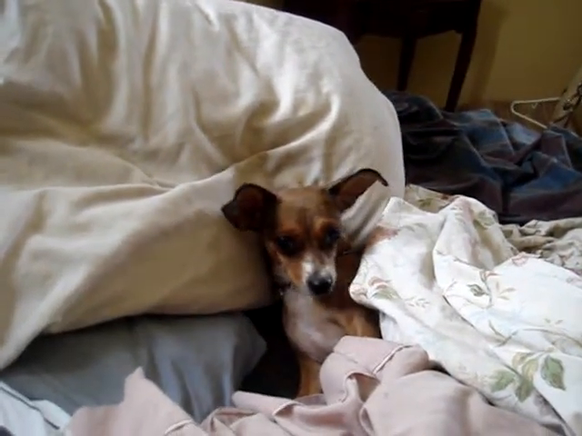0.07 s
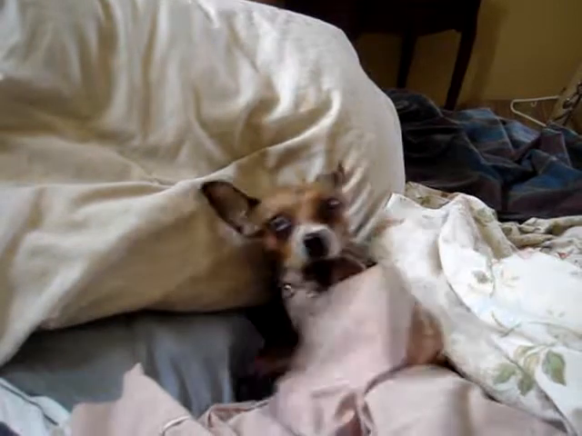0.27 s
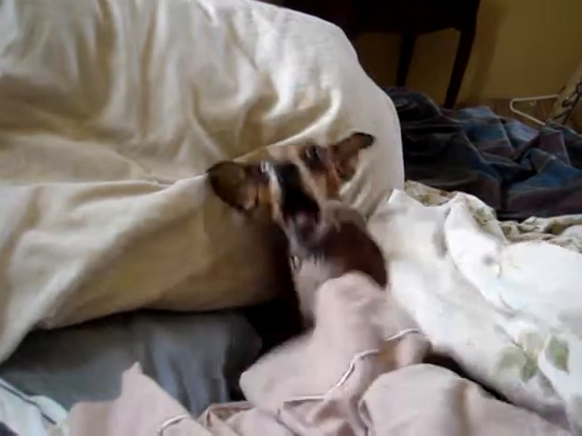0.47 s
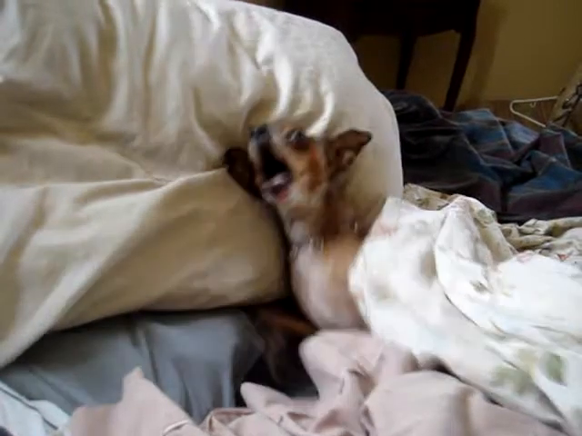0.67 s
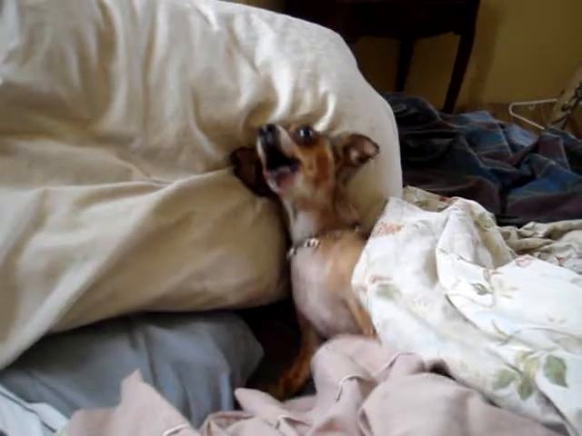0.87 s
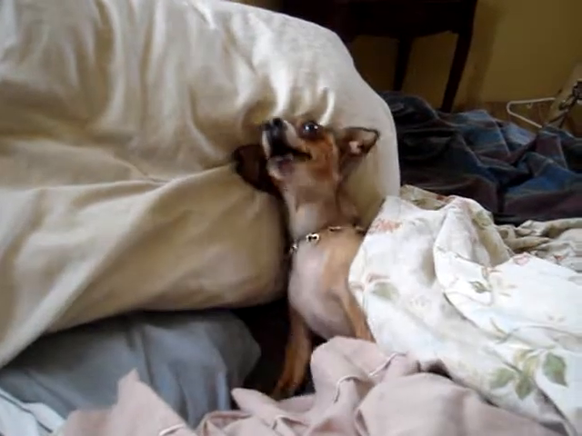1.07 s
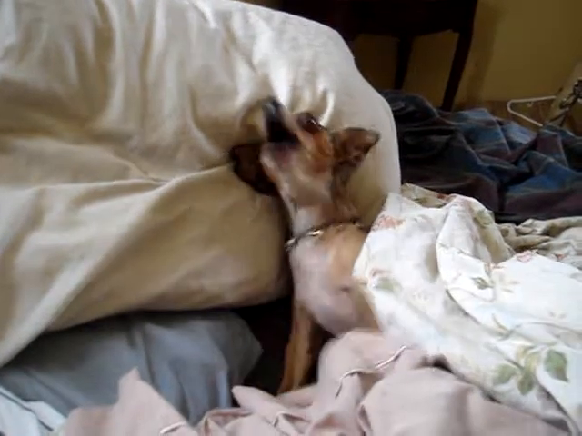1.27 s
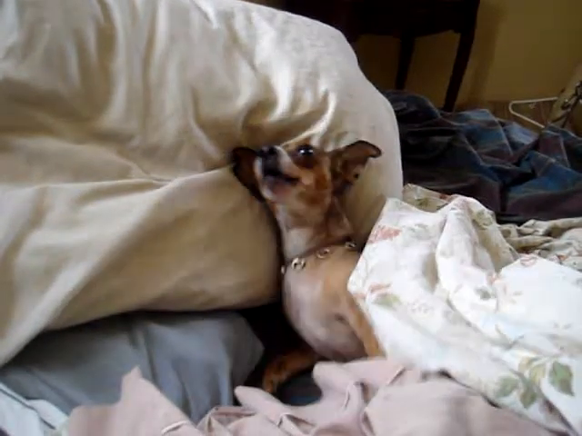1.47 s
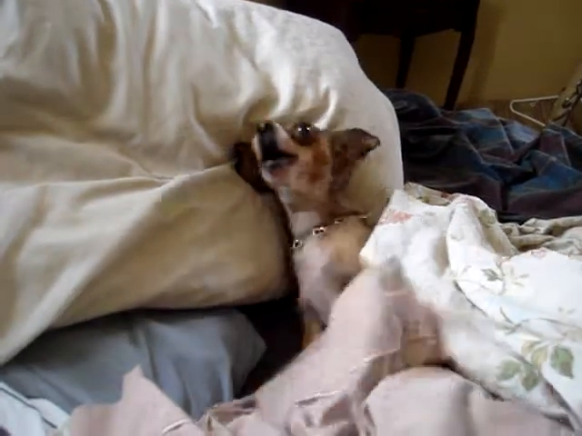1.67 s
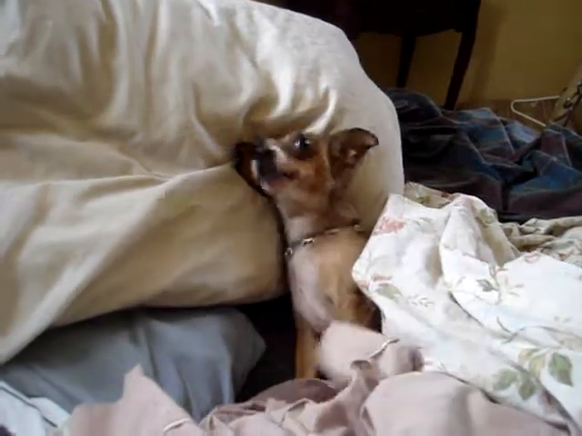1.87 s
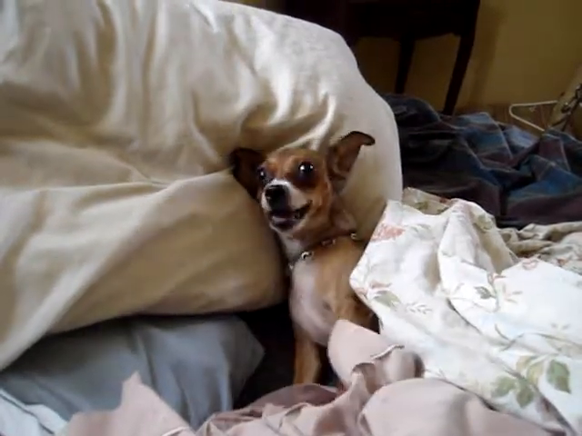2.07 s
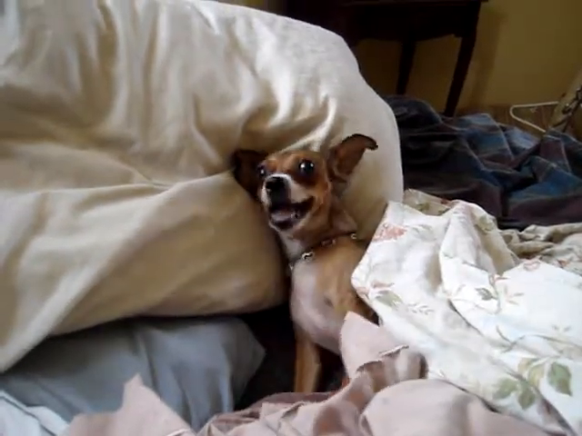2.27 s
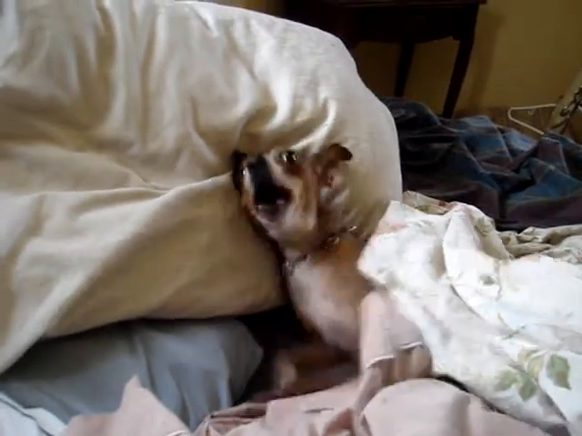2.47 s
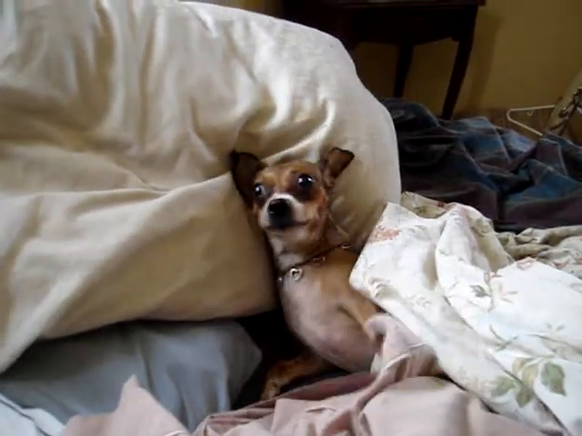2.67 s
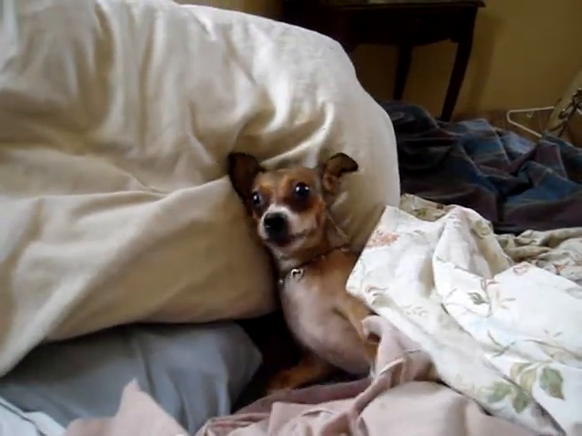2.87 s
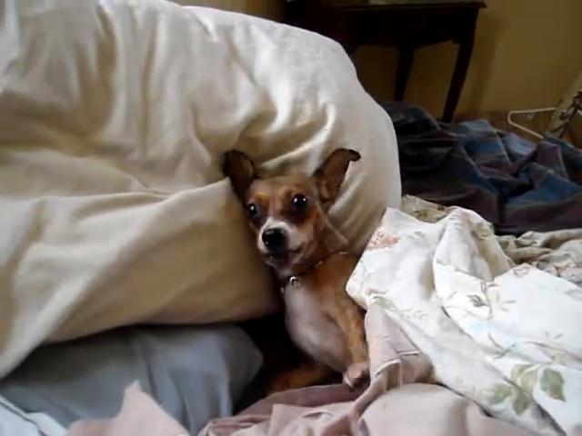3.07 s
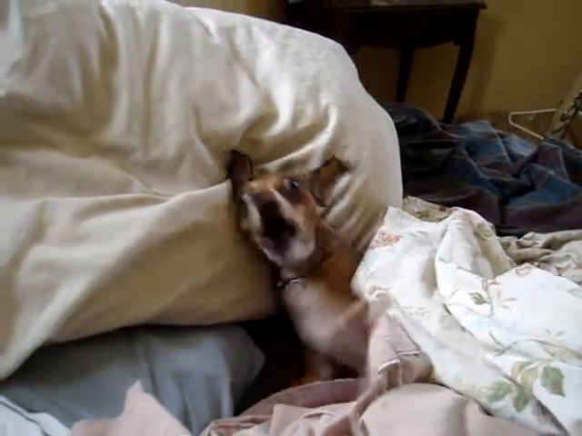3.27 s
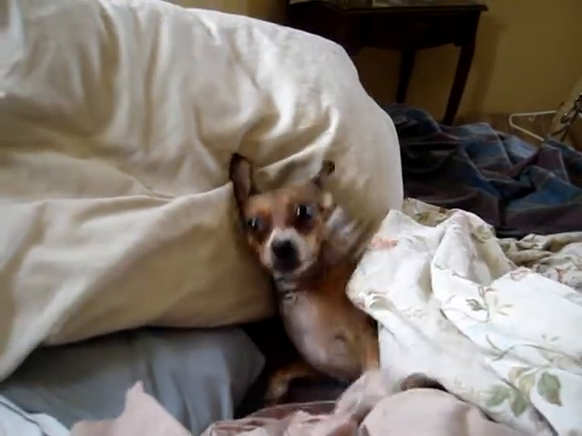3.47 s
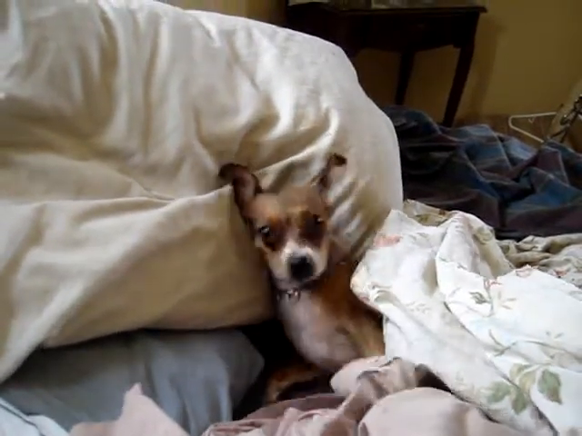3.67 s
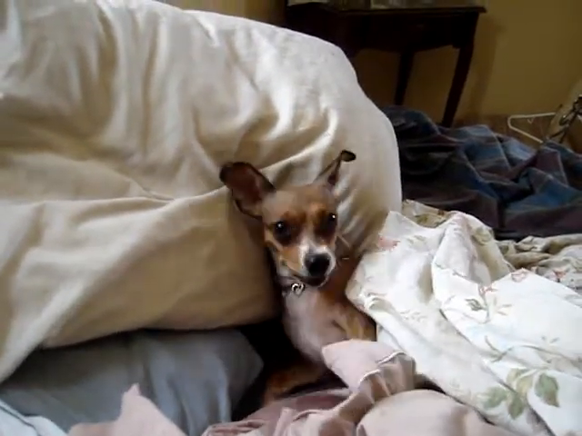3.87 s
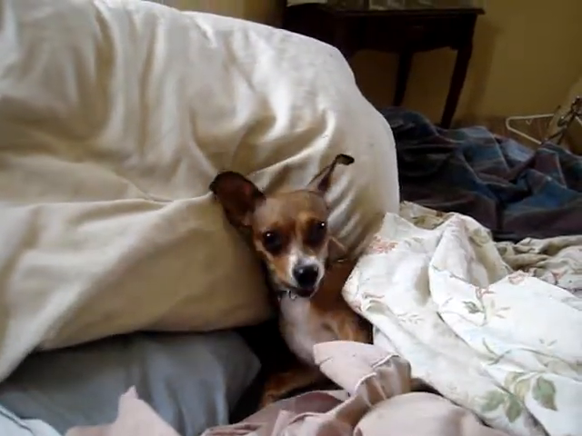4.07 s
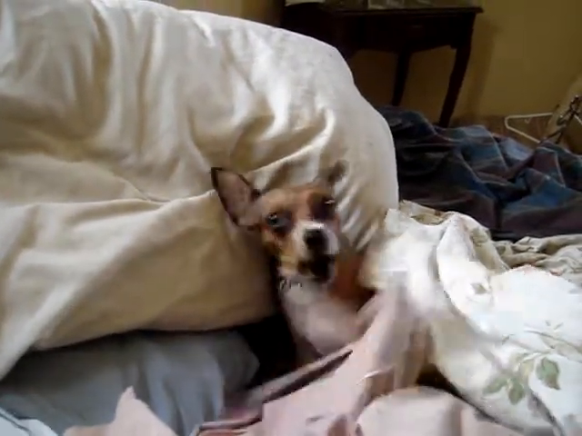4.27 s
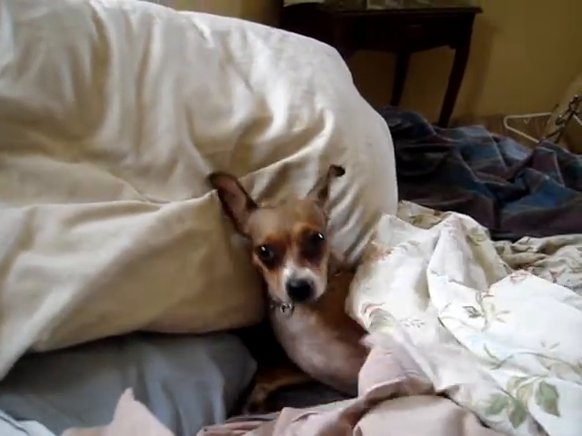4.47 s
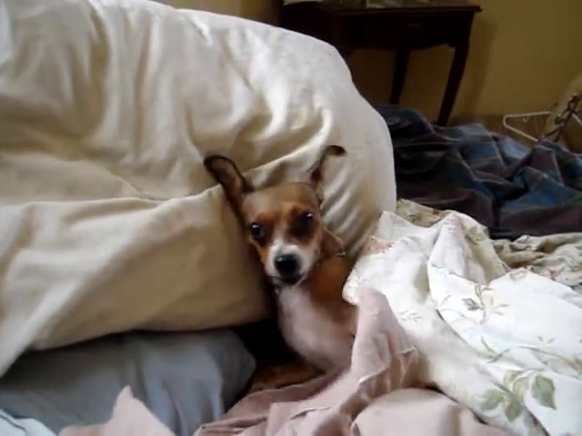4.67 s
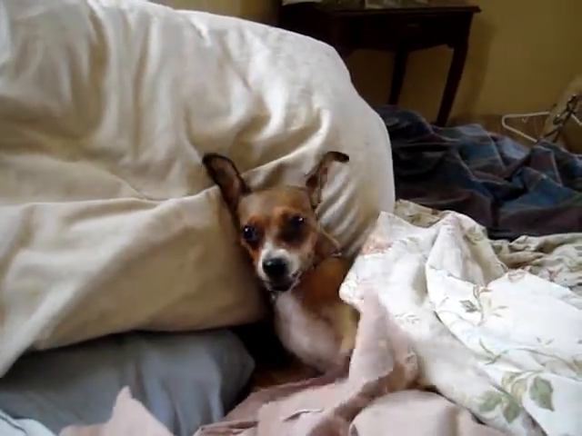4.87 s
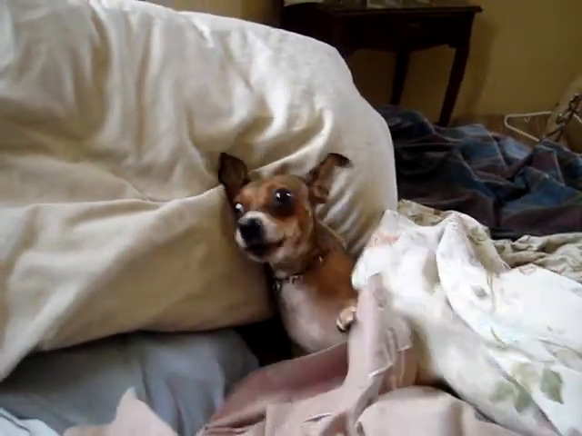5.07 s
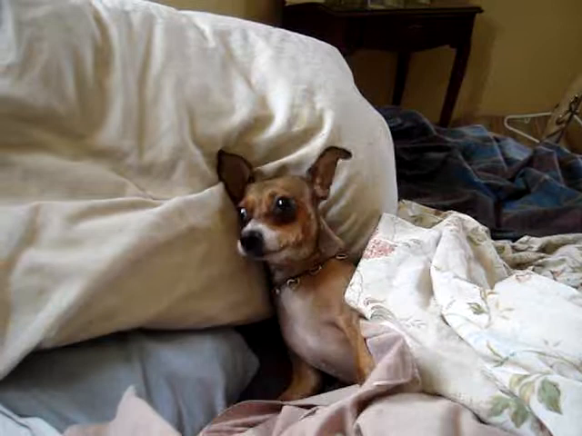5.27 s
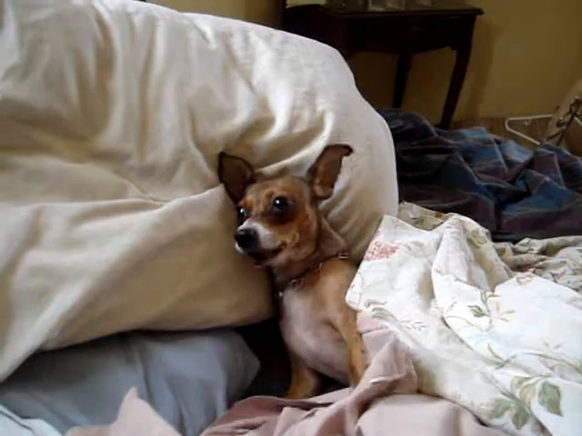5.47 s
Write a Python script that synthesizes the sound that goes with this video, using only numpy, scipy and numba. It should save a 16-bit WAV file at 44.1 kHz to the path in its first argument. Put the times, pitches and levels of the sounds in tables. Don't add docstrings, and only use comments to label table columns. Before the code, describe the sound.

Close, loud, high-pitched yelping from one tiny dog on a bed. The first cry is the longest, a rough bark stretched into a scream; the second comes as a quick double, then single yelps with whimpering tails follow. Faint mains hum and hiss sit behind, ducked by automatic gain and creeping back. The sound is slightly squashed, with dull top treble and a short room reflection.

```python
import sys
import numpy as np
from scipy import signal
from scipy.fft import rfft, irfft, next_fast_len
from scipy.io import wavfile
from scipy.ndimage import uniform_filter1d, map_coordinates
from numba import njit

SR = 44100
rng = np.random.default_rng(int(sys.argv[2]) if len(sys.argv) > 2 else 0)


def rack_gain(trim_db):
    fader = np.asarray(trim_db, float)
    return 10 ** (fader / 20)


def materialize(psi):
    bounded = np.clip(np.atleast_2d(psi).T, -1, 1)
    quanta = np.round(bounded * 32767).astype(np.int16)
    wavfile.write(sys.argv[1], SR, quanta)


N = 243873

# pitch_hz, level_db
HUM_LINES = [(117.8, -35), (120, -13.5), (240, -3), (480, -6)]
# freq_hz, density_db_per_hz
HISS_COLOUR = [(8.8, -38.5), (15, 0.5), (60, -18.5), (115, -11.5), (168, -17), (232, -9.5), (289, -8),
               (422, -4), (669, 3.5), (926, -8), (1000, -5.5), (5400, -17.5), (9810, -24), (12800, -68.5),
               (21600, -120)]
# start_s, push_s, depth_db
DUCKS = [(0.261, 0.14, 22), (.3, 0.41, 24), (1.2, .22, 16), (1.499, 0.2, 17.5), (2.3, 0.34, 10.5),
         (3.25, 0.12, 13.5), (4.1, 0.18, 14.5), (4.93, .17, 15)]
REST_DB, RECOVER_S, FRESH_DB = -48, 0.72, 6

# start_s, peak_db, jaw_shut_sag_db, upper_resonance_hz, throat_db
BARKS = [
    (.262, -12, 8, 4083, -17.5),
    (1.269, -13, 16, 3480, -19.5),
    (1.61, -14, 10.5, 3990, -20.5),
    (2.403, -12.5, 11, 3870, -22.5),
    (3.298, -12.5, 8.5, 4360, -19.5),
    (4.199, -12.5, 8, 5240, -17.5),
    (4.969, -13.5, 10, 4520, -17.5),
]
ATTACK_S, HOLD_S, SHUT_S, HOLD_DROP_DB, TAIL_DB_PER_S = 0.0044, 0.052, 0.1007, 2.5, 139.5
# since_start_s, opening_0_to_1
JAW = [(0, 0.93), (.05, .7), (.097, 0), (.2, .3), (.3, 0)]
# peak_s, level_db, rise_20db_s, fall_20db_s, jaw_opening_0_to_1
HUFFS = [(.4, -23.5, 0.03, .15, .4), (.46, -16.5, 0.0862, 0.1233, 0.71), (.55, -22, -0.12, 0.2775, 0.62),
         (.9, -31, .15, 0.1, 0.7), (1.02, -34, -0.5, 0.08, .15), (1.44, -29, 0.18, 0.22, 0.2),
         (1.612, -15, 0.1, 0.0321, 0.42), (1.968, -36.5, 0.31, 0.037, .1), (2.05, -39.5, 0.67, 0.08, 0.2),
         (2.585, -26, .025, .065, .4), (2.67, -50, 0.5, -0.35, 0.1), (2.82, -47, 0.3, 0.24, 1),
         (2.932, -35, 0.103, -0.05, 0.4), (3.02, -44.5, -0.2, -0.05, .05), (3.863, -46, 0.5, -0.34, 0.2),
         (4.679, -42, 0.3, 0.1, 0.05), (5.414, -48, 0.3, .025, 0.2)]
MOUTH_HZ, UPPER_SHUT = (2070, 3250), 1.045
NOSE_S, NOSE_DB, NOSE_RISE_S, NOSE_FALL_S, HUFF_NOSE_DB = 0.08, -15.5, 0.056, .11, -15
# freq_hz, density_db_per_hz
RASP_COLOUR = [(290, -63), (500, -33), (760, -19), (874, 1.5), (1140, -7), (1340, 0), (1910, 1.5),
               (4510, 0), (6500, 0), (8450, -32.5), (14300, -120)]
# since_start_s, rel_level_db, pitch_hz
THROAT = [(0, -1.5, 1380), (.032, 0, 1400), (0.061, -8.5, 984), (.1, -12, 1060), (.2, -39.5, 1040)]
# peak_s, level_db, rise_20db_s, fall_20db_s, pitch_hz
CROAKS = [(.39, -27, 0.0272, -0.07, 1431), (.462, -20, 0.08, 0, 1282), (.53, -33, .08, .06, 1104),
          (.59, -36, -0.1, 0.08, 1592), (1.014, -37.5, 0, 0.13, 1620), (1.39, -21.5, 0.1267, 0.26, 1119),
          (1.52, -27.5, 0.1, 0.02, 998), (1.61, -19.5, 0.13, 0.12, 1171), (1.735, -21, 0.0751, 0.22, 990),
          (1.96, -30.5, 0.04, -0.0386, 1019), (2.54, -28.5, 0.1451, 0.3, 1050), (2.8, -42, .2, -0.12, 943),
          (2.9, -29, .1, .03, 1000), (3.425, -23, -0.03, 0.2051, 1076), (3.56, -36.5, -0.54, 0.2545, 1005),
          (3.84, -35, .06, .025, 996), (4.47, -37.5, -0.33, 0.42, 1004), (5.09, -29, 0.17, 0.05, 1376),
          (5.182, -34, -0.02, -0.13, 1002), (5.255, -41, 0.2, -0.1, 1008), (5.4, -30, .08, -0.16, 1003)]
# peak_s, level_db
PHARYNX = [(.44, -33), (1.554, -21), (1.968, -19), (2.6, -25), (2.83, -38), (2.9, -31), (3.52, -29),
           (3.83, -36), (4.46, -32), (5.182, -25), (5.34, -38), (5.4, -35)]
PHARYNX_S, PHARYNX_DB, PHARYNX_RISE_S, PHARYNX_FALL_S, PHARYNX_LEAK_DB = 0.061, -1, 0.053, 0.042, -17.5
SWELL_CURVE = 1.27
# lowest_s, descent_s, level_db, from_hz, to_hz
SWOOPS = [(.33, .062, -21, 3300, 2250), (1.035, .035, -39, 2187, 906), (1.355, .055, -18, 3625, 1876),
          (1.69, 0.0854, -18.5, 4256, 1830), (2.49, .075, -25, 4160, 1695),
          (3.385, .055, -27.5, 3520, 1816), (4.3, 0.056, -38, 3330, 2278), (5.06, .06, -25, 3680, 2170)]
SWOOP_START_DB, REBOUND_S, REBOUND_DB, REBOUND = -3, 0.049, -11.5, 1.17

# freq_hz, t60_s
BEDROOM_T60 = [(300, 0.18), (1000, 0.52), (4000, 0.441), (10000, 0.36)]

# time_s, pitch_hz, effort_db, favoured_partial
SCREAM = [
    [(.405, 1761, -26, 3), (.427, 1781, -21, 2.6), (.445, 1754, -28.5, 1.2)],
    [(.49, 1849, -19.5, 1.8), (.576, 1788, -22, 2.26), (.594, 1610, -23, 1.8), (.64, 1874, -18, 2.5),
     (.714, 1827, -19, 2.2), (.854, 1641, -24.5, 2.57), (.938, 1786, -19.5, 1.92),
     (.966, 1886, -26.5, 2.26), (1.0, 1874, -21.5, .6)],
]
FAVOUR_DB, HIGH_LOSS_DB = 4.5, 2
# peak_s, level_db, rise_s, fall_s
DOUBLINGS = [(.425, -19, 0.035, 0.03), (.49, -25, 0.016, 0.098), (.714, -26, 0.039, .08),
             (.938, -20, 0.039, 0.016)]
# multiple, level_db
HALVES = [(.5, -20.5), (1.5, 0), (2.5, -5), (3.5, -9.5), (4.5, -26.5)]

# start_s, length_s, peak_db, from_hz, to_hz
SQUEAKS = [(1.426, 0.0315, -12, 1070, 1030), (1.725, .075, -23.5, 1075, 1041),
           (3.665, .055, -37.5, 1090, 980), (3.722, .05, -36.5, 985.6, 975.3),
           (4.378, 0.0787, -16.5, 1050, 895), (4.54, .08, -40.5, 1024, 1070),
           (5.245, 0.0693, -35.5, 990, 954)]
CLIMBS = [(1.545, 0.046, -16, 940, 1040), (2.72, .125, -36, 960, 985), (2.85, .068, -24, 985, 960),
          (3.775, .085, -27, 975, 953), (4.31, .055, -15, 1150, 1197), (4.622, 0.087, -25, 1075, 1011),
          (5.335, .092, -27, 965, 1000)]
HELD = [(1.966, 0.1, -17.5, 962, 968), (2.931, 0.0925, -16.5, 1018, 1010), (5.108, .082, -18, 1064, 950)]
# length_share, rel_peak_db
SQUEAK_SHAPE = [(0, -15), (.18, 0), (.8, -5.5), (1, -15)]
CLIMB_SHAPE = [(0, -16.5), (0.701, 1), (1, -12.5)]
HELD_SHAPE = [(0, -2), (.1, -1.5), (.88, -2.5), (1, -9.5)]
SQUEAK_OCTAVE_DB, CLIMB_OCTAVE_DB, HELD_OCTAVE_DB = -21.5, -27, -18.5
# multiple, rel_octave_db
WHINE_TOP = [(3, -8.5), (4, -5.5), (5, -16), (7, -26)]

# start_s, length_s, peak_db, from_hz, to_hz
MOANS = [(1.44, 0.0897, -41, 561, 559.2), (1.526, 0.036, -34.5, 570, 632), (1.78, 0.085, -38.5, 554, 613),
         (1.862, 0.1117, -33, 569, 606.2), (2.65, .12, -40.5, 468, 579), (2.772, 0.193, -38, 580, 621),
         (3.45, 0.22, -44, 610, 590.9), (5.33, 0.096, -40.5, 597, 600)]
# length_share, rel_peak_db
MOAN_SHAPE = [(0, -3.5), (.75, 0), (1, -2)]

# start_s, length_s, peak_db, pitch_hz, overtones_rel_db
YIPS = [(2.575, 0.0492, -24, 895, -24), (3.351, 0.0362, -18, 866, -10.5), (3.496, 0.036, -20.5, 858, -19),
        (4.226, 0.069, -20.5, 880, -14), (5.021, .06, -21.5, 870, -10)]
# length_share, rel_peak_db
YIP_SHAPE = [(0, -13.5), (.45, 0), (1, -16.5)]
YIP_THIRD_DB = -4


def unit(x):
    return x / np.sqrt(np.mean(x ** 2) + 1e-20)


def along(points, hz):
    f, v = np.transpose(points)
    return np.interp(np.log(hz + 1), np.log(f + 1), v)


def curves(tables, fade=0.0014):
    t = np.arange(N) / SR
    gates = [np.clip(np.minimum(t - r[0][0], r[-1][0] - t) / fade + .5, 0, 1) for r in tables]
    s, *cols = np.transpose(sorted(row for r in tables for row in r))
    return [np.max(gates, axis=0)] + [np.interp(t, s, c) for c in cols]


def swells(rows):
    s, db, rise, fall, *more = np.transpose(rows)[..., None]
    late = np.arange(0, N, 16) / SR - s
    spans = np.abs(late / np.where(late < 0, rise, fall))
    level = db - 20 * spans ** SWELL_CURVE - 200 * np.maximum(spans - 1, 0)
    top = level.argmax(axis=0)
    columns = [level.max(axis=0)] + [c[top, 0] for c in more]
    return [np.repeat(v, 16)[:N] for v in columns]


def notes(rows, shape):
    return [[(s + u * span, a + u * (b - a), db + rel) for u, rel in shape] for s, span, db, a, b in rows]


def wobble(rate):
    return map_coordinates(rng.standard_normal(int(N * rate / SR) + 4), [np.arange(N) * rate / SR])


def filtered(x, response):
    m = next_fast_len(N + SR // 2)
    return irfft(rfft(x, m) * response(np.fft.rfftfreq(m, 1 / SR)), m)[..., :N]


def phase(hz, jitter):
    return 2 * np.pi * np.cumsum(hz * (1 + jitter * wobble(250))) / SR


def partial(db, angle, shimmer_db):
    return np.sqrt(2) * rack_gain(db + shimmer_db * wobble(120)) * np.sin(angle)


def gain_control():
    t = np.arange(N) / SR
    depth = []
    for s, push, db in DUCKS:
        recovery = np.exp(-np.maximum(t - s - push, 0) / RECOVER_S)
        depth.append(db * np.clip((t - s) / push, 0, 1) * recovery)
    first, push, _ = DUCKS[0]
    return REST_DB - np.max(depth, axis=0) + FRESH_DB * np.clip(1 - (t - first) / push, 0, 1)


def background():
    t = np.arange(N) / SR
    hum = sum(partial(db, 2 * np.pi * hz * t, 0.66) for hz, db in HUM_LINES)
    hiss = unit(filtered(rng.standard_normal(N), lambda hz: rack_gain(along(HISS_COLOUR, hz))))
    return rack_gain(gain_control()) * (hum + rack_gain(7.5 + wobble(9)) * hiss)


def rough_folds(rate_hz, jitter, drift, scatter_db, air):
    turns = np.cumsum(rate_hz * np.exp(jitter * wobble(350) + drift * wobble(28))) / SR
    snaps = np.diff(np.floor(turns), prepend=0) * rack_gain(scatter_db * rng.standard_normal(N))
    puffs = np.sin(np.pi * turns) ** 4 * rng.standard_normal(N)
    return -np.sqrt(1 - air) * unit(snaps) + np.sqrt(air) * unit(puffs)


@njit
def two_pole(x, pull, drag):
    y = np.zeros(len(x))
    for i in range(2, len(x)):
        y[i] = x[i] - x[i - 2] + pull[i] * y[i - 1] - drag * y[i - 2]
    return y


def resonance(x, hz, width_hz, count=2):
    r = np.exp(-np.pi * width_hz / SR)
    pull = 2 * r * np.cos(2 * np.pi * hz / SR)
    for _ in range(count):
        x = two_pole(x, pull, r * r)
    return unit(x)


def clumped_ring(folds, hz, width_hz, count=2):
    clumps = rack_gain(2 * wobble(45))
    return clumps * resonance(folds, hz * (1 + .03 * wobble(40)), width_hz, count)


def levelled(x, span=0.033):
    return x / np.sqrt(np.abs(uniform_filter1d(x ** 2, int(span * SR))) + .02)


def hops(hz, slide=0.013):
    rungs = 1040 + 165 * np.round((hz - 1040) / 165)
    return uniform_filter1d(.7 * rungs + .3 * hz, int(slide * SR))


def since_bark():
    t, rows = np.arange(N) / SR, np.array(BARKS)
    row = rows[np.maximum(np.searchsorted(rows[:, 0], t) - 1, 0)].T
    return t - row[0], row


def mouth():
    u, (_, peak_db, sag_db, upper_hz, _) = since_bark()
    shut = np.clip((u - HOLD_S) / (SHUT_S - HOLD_S), 0, 1)
    bark_db = peak_db - np.interp(u, [-ATTACK_S, 0, ATTACK_S, HOLD_S], [200, 30, 0, HOLD_DROP_DB])
    bark_db = bark_db - shut * (sag_db - HOLD_DROP_DB) - TAIL_DB_PER_S * np.maximum(u - SHUT_S, 0)
    huff_db, huff_jaw = swells(HUFFS)
    jaw = np.where(bark_db > huff_db, np.interp(u, *np.transpose(JAW)), huff_jaw)
    opening = np.clip(uniform_filter1d(jaw, size=400), 0, 1.2)
    shut_hz, open_hz = MOUTH_HZ
    mouth_hz = shut_hz + (open_hz - shut_hz) * opening
    upper_shut_hz = UPPER_SHUT * upper_hz
    upper_hz = upper_shut_hz + (upper_hz - upper_shut_hz) * opening
    nose_db, = swells([(s + NOSE_S, db + NOSE_DB, NOSE_RISE_S, NOSE_FALL_S) for s, db, *_ in BARKS])
    return np.maximum(bark_db, huff_db), mouth_hz, upper_hz, np.maximum(nose_db, huff_db + HUFF_NOSE_DB)


def throat_shape():
    u, row = since_bark()
    into, rel_db, hz = np.transpose(THROAT)
    bark_db = np.where((u > 0) & (u < into[-1]), row[-1] + np.interp(u, into, rel_db), -120)
    croak_db, croak_hz = swells(CROAKS)
    db = np.maximum(bark_db, croak_db)
    throat_hz = np.where(bark_db > croak_db, np.interp(u, into, hz), croak_hz)
    opens = PHARYNX + [(s + PHARYNX_S, throat_db + PHARYNX_DB) for s, *_, throat_db in BARKS]
    low_db, = swells([(s, open_db, PHARYNX_RISE_S, PHARYNX_FALL_S) for s, open_db in opens])
    return db, throat_hz, np.maximum(low_db, db + PHARYNX_LEAK_DB)


def jaw_swoops(folds):
    tables = []
    for s, span, db, a, b in SWOOPS:
        tables.append([(s - span, db + SWOOP_START_DB, a), (s, db, b),
                       (s + REBOUND_S, db + REBOUND_DB, REBOUND * b)])
    closing, db, hz = curves(tables, fade=0.006)
    return closing * rack_gain(db) * levelled(clumped_ring(folds, hz, 420))


def rasp():
    folds = rough_folds(rate_hz=760, jitter=.07, drift=.17, scatter_db=3, air=.1)
    db, mouth_hz, upper_hz, nose_db = mouth()
    broad = unit(filtered(folds, lambda hz: rack_gain(along(RASP_COLOUR, hz)) * (hz > 950)))
    lower_ring = clumped_ring(folds, mouth_hz, 300, count=1)
    upper_ring = clumped_ring(folds, upper_hz, 500, count=1)
    body = rack_gain(-5) * lower_ring + rack_gain(-5) * upper_ring + broad
    body = filtered(body, lambda hz: 1 / (1 + (hz / 6000) ** 12))
    turbulent = folds + .8 * rng.standard_normal(N)
    nose = resonance(turbulent, np.full(N, 7300.), 2000)
    throat_db, throat_hz, pharynx_db = throat_shape()
    throat = rack_gain(-0.5) * levelled(resonance(folds, hops(throat_hz), 133))
    throat = throat + rack_gain(-8.5) * clumped_ring(folds, 1104, 700)
    pharynx = levelled(resonance(folds, np.full(N, 875.), 89))
    low = rack_gain(throat_db) * throat + rack_gain(pharynx_db) * pharynx
    voice = rack_gain(db) * unit(body) + rack_gain(nose_db) * nose + low + jaw_swoops(folds)
    return filtered(voice, lambda hz: 1 / (1 + (760 / (hz + 1)) ** 8))


def bedroom(x):
    hz, t, z = signal.stft(rng.standard_normal(SR // 2), SR, nperseg=256)
    decay = rack_gain(-60 * t / along(BEDROOM_T60, hz)[:, None])
    tail = signal.istft(z * decay, SR, nperseg=256)[1]
    return signal.fftconvolve(np.pad(x, (300, 0)), tail / np.linalg.norm(tail))[:N]


def scream():
    gate, hz, db, favoured = curves(SCREAM, fade=0.024)
    partials_db = [db - FAVOUR_DB * (k - favoured) ** 2 - HIGH_LOSS_DB * max(k - 2, 0) for k in range(1, 5)]
    half_db, = swells(DOUBLINGS)
    settling = np.interp(np.arange(N) / SR, [.45, .5, .63], [.008, .035, .009])
    angle = phase(hz, jitter=settling)
    whole = sum(partial(level_db, k * angle, 1.6) for k, level_db in enumerate(partials_db, 1))
    fifth = partial(partials_db[-1] - 13, 5 * angle, 1.6)
    halves = sum(partial(half_db + rel_db, k * angle, 3) for k, rel_db in HALVES)
    return gate * (whole + fifth + halves)


def whines():
    kinds = [(SQUEAKS, SQUEAK_SHAPE, SQUEAK_OCTAVE_DB), (CLIMBS, CLIMB_SHAPE, CLIMB_OCTAVE_DB),
             (HELD, HELD_SHAPE, HELD_OCTAVE_DB)]
    tables = []
    for rows, shape, rel_db in kinds:
        for note in notes(rows, shape):
            tables.append([(s, hz, db, db + rel_db) for s, hz, db in note])
    gate, hz, db, octave_db = curves(tables, fade=.007)
    angle = phase(hz, jitter=.005)
    top = sum(partial(octave_db + rel_db, k * angle, 1.5) for k, rel_db in WHINE_TOP)
    return gate * (partial(db, angle, 1.4) + partial(octave_db, 2 * angle, 1.2) + top)


def moans():
    gate, hz, db = curves(notes(MOANS, MOAN_SHAPE), fade=0.026)
    return gate * partial(db, phase(hz, jitter=0.056), 2.0)


def yips():
    tables = []
    for s, span, db, hz, over in YIPS:
        tables.append([(s + u * span, hz, db + rel, db + over) for u, rel in YIP_SHAPE])
    gate, hz, db, over_db = curves(tables, fade=.01)
    angle = phase(hz, jitter=0.011)
    partials_db = [db, over_db, over_db + YIP_THIRD_DB]
    return gate * sum(partial(level_db, k * angle, 3.8) for k, level_db in enumerate(partials_db, 1))


def scene():
    dog = rasp() + scream() + whines() + moans() + yips()
    return (background() + rack_gain(-1.13) * dog + rack_gain(-13.0) * bedroom(dog))[None]


def band_limit(x):
    return signal.sosfilt(signal.butter(12, 16450, fs=SR, output="sos"), x)


def record(dry):
    top = np.where(dry > 0, .4, .6)
    squashed = dry / (1 + np.abs(dry / top) ** 5) ** (1 / 5)

    def microphone(hz):
        colour = rack_gain(along([(8000, 1.5), (9900, -7.5)], hz))
        bass_cut = hz / np.hypot(hz, 12)
        return (hz < 9960) * colour * bass_cut

    railed = np.maximum(filtered(squashed, microphone), -.72)
    return band_limit(railed)


dry = scene()
out = record(dry)
materialize(out)
```